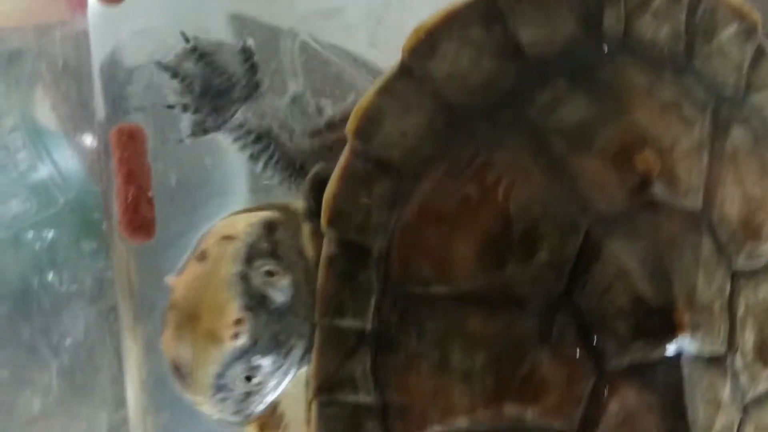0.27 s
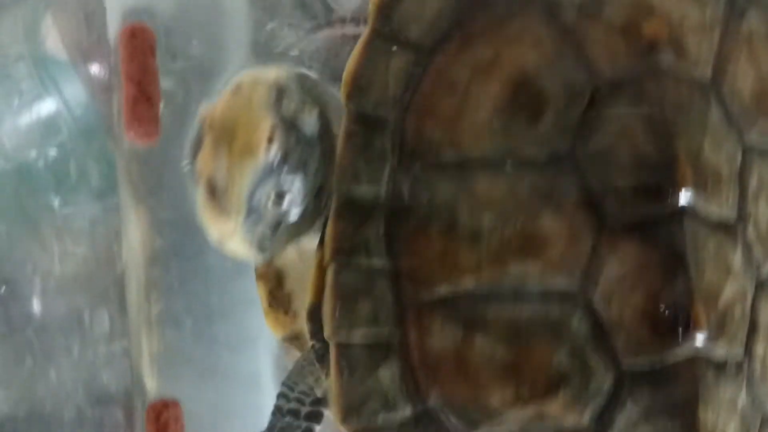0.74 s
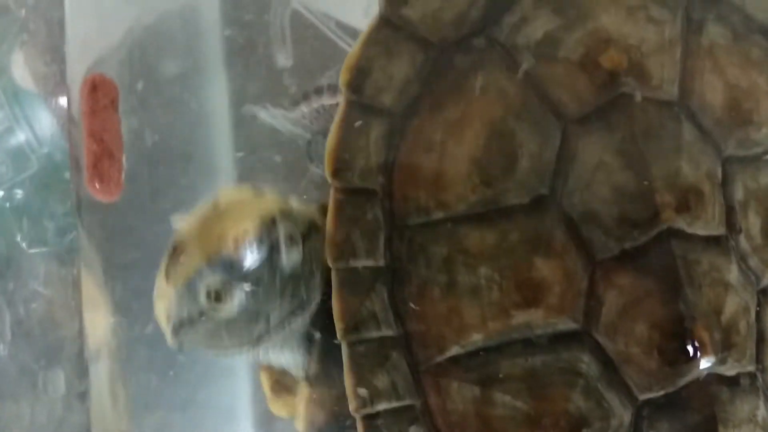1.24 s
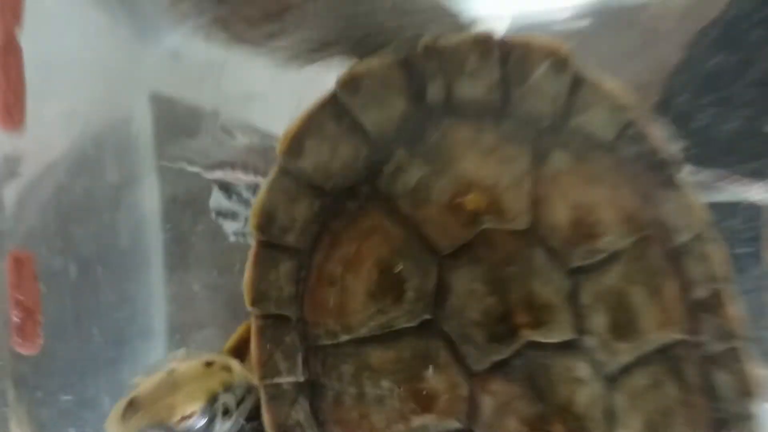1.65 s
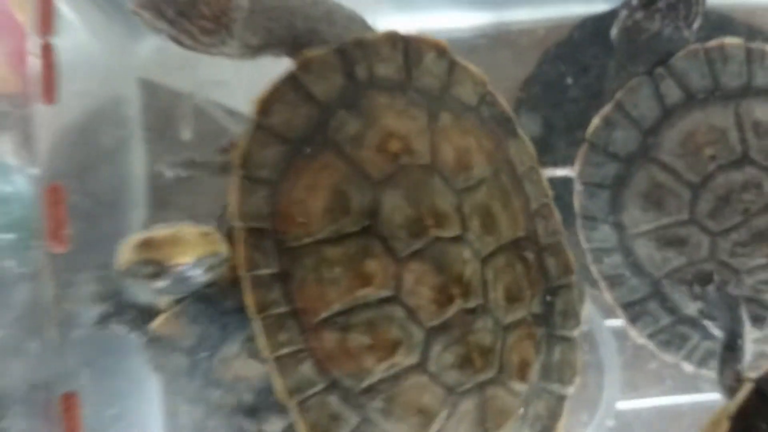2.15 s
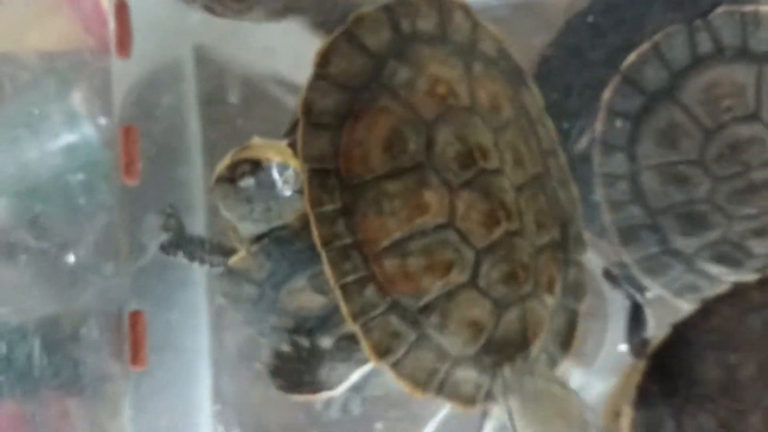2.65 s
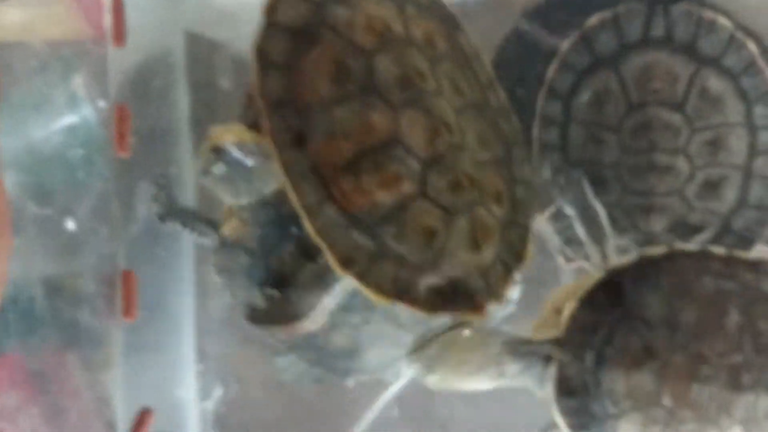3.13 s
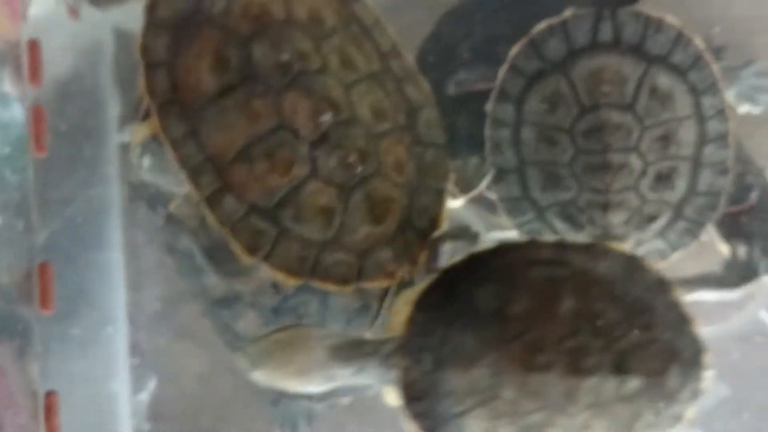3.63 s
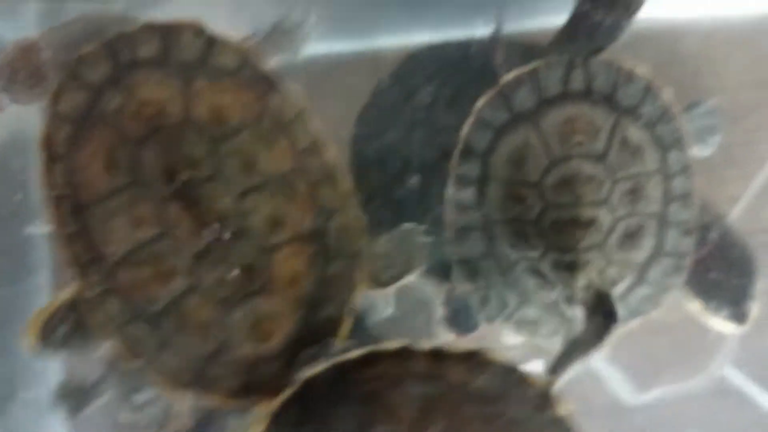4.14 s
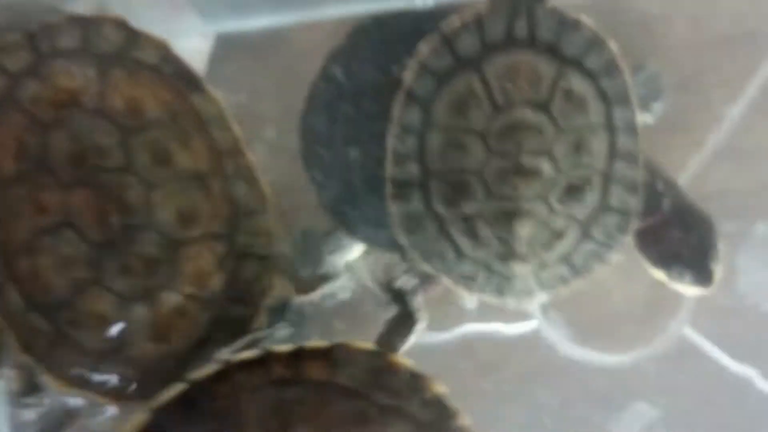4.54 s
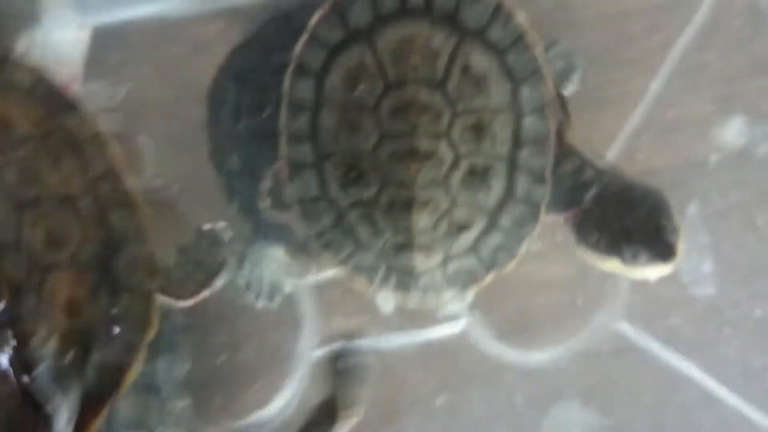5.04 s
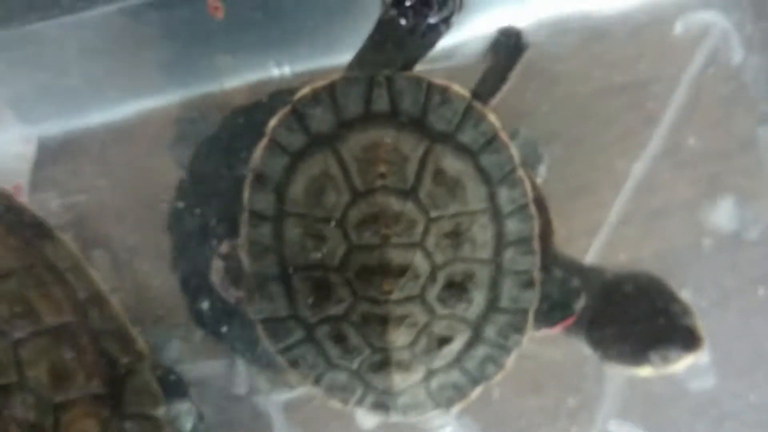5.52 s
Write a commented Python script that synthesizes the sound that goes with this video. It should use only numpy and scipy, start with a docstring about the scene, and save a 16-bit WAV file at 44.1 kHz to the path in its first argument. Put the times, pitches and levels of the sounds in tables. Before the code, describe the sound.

Small turtles scratch and knock hollowly against a plastic tank over soft hiss and a thin high equipment whine indoors.

```python
"""Indoors, equipment hums with a steady airy whine over even hiss while small turtles clamber in a plastic tank.
Hollow taps, decaying tones, come first among claw scratches, which are random tiny catches filtered by colour.
Dull bass bumps, swelling sine tones with muffled noise, and faint paddling follow.
Then shells knock hard on the walls: sums of decaying sines with coloured noise and sharp clicks.
Near the end a wet foot squeaks, a wavering tone whose pitch and level rise and fall."""
import sys
import numpy as np
from scipy import signal
from scipy.fft import rfft, irfft
from scipy.io import wavfile
from scipy.ndimage import uniform_filter1d

SR = 44100
rng = np.random.default_rng(int(sys.argv[2]) if len(sys.argv) > 2 else 0)


def materialize(psi):
    """Save the field psi as 16-bit PCM at rate SR to the path in sys.argv[1].

    A 1-D psi becomes a single channel; in a 2-D psi each row is a channel.
    """
    bounded = np.clip(np.atleast_2d(psi).T, -1, 1)
    quanta = np.round(bounded * 32767).astype(np.int16)
    wavfile.write(sys.argv[1], SR, quanta)


N = 254898
T = np.arange(SR // 2) / SR  # seconds since a contact

# colour of the highest, sharpest part of claw strokes and knocks: f/Hz, level/dB
TICK_COLOUR = [(3000, -46), (6000, -15), (7500, -9.5), (11000, 0), (13000, -7), (15500, 2.5)]


def undb(db):
    """Turn decibels into a gain."""
    return 10 ** (np.asarray(db) / 20)


def fade(t60):
    """Die away exponentially, falling by 60 dB in t60 seconds."""
    return np.exp(-np.log(1000) * T / t60)


def unit(x):
    """Scale a sound to an average (rms) level of 1."""
    return x / np.sqrt(np.mean(x ** 2))


def blow(x, db):
    """Give a short sound the energy of 30 ms of stereo sound at this level."""
    full_energy = 2 * 0.03 * SR
    return x * undb(db) / np.sqrt(np.sum(x ** 2) / full_energy)


def pan(db):
    """Left and right gains of constant power; db is left minus right."""
    return unit(undb(np.array([[db], [-db]]) / 2))


def colour(x, points):
    """Shape the spectrum through (Hz, dB) points, with no sound ahead of its cause."""
    n = x.shape[-1]
    hz, db = np.transpose(points)
    log_bins = np.log(np.fft.rfftfreq(n, 1 / SR) + 1)
    gain = undb(np.interp(log_bins, np.log(hz), db))
    # folding the cepstrum forward makes the filter causal
    cepstrum = irfft(np.log(gain), n)
    cepstrum[1:n // 2] *= 2
    cepstrum[n // 2 + 1:] = 0
    return irfft(rfft(x) * np.exp(rfft(cepstrum)), n)


def band(x, lo_hz, hi_hz, order=2):
    """Keep only the sound between two pitches."""
    return signal.sosfilt(signal.butter(order, [lo_hz, hi_hz], "band", fs=SR, output="sos"), x)


def add(out, s, x):
    """Mix a sound in at time s."""
    i = int(s * SR)
    out[:, i:i + x.shape[1]] += x[:, :N - i]


def steps(spell, gap_s, db, scatter_db=2):
    """Uneven footfalls through a spell, about gap_s apart: rows of (s, dB)."""
    late, strong = rng.random((32, 2)).T
    times = spell[0] + gap_s * (np.arange(len(late)) + late)
    end = min(spell[1], N / SR)
    return [(s, db + scatter_db * (2 * u - 1)) for s, u in zip(times, strong) if s < end]


def tank(x, direct_db=-7, near_t60=0.03, room_t60=0.1, room_db=-20):
    """Add the straight path, a quick flurry between the tank's walls, and the room's echo."""
    flurry = fade(near_t60) * (1 - fade(0.0015))
    room = undb(room_db) * fade(room_t60)
    paths = blow(rng.standard_normal((2, len(T))) * (flurry + room), 0)
    straight = np.zeros_like(paths)
    straight[0, 10] = straight[1, 0] = 1  # the left hears it 10 samples later
    return signal.fftconvolve(paths + blow(straight, direct_db), x, axes=1)[:, :len(T)]


def ring(modes, spread):
    """Ring a set of modes, weighted anew each time, left and right out of step by about spread radians."""
    out = 0
    for k, (hz, db, t60) in enumerate(modes):
        weight, detune, shift = rng.standard_normal(3)
        stereo_shift = spread * shift * np.array([[0.5], [-0.5]])
        phase = 2 * np.pi * hz * (1 + 0.0017 * detune) * T + stereo_shift
        sign = (-1) ** k
        out = out - sign * undb(db + 2 * weight) * fade(t60) * np.sin(phase)
    return out * (1 - fade(0.0067))


def murk(points, t60, apart_hz=900):
    """Countless crowded modes die away together as noise; left and right agree only in the bass."""
    mid, side = rng.standard_normal((2, len(T))) * fade(t60)
    side = signal.sosfilt(signal.butter(1, apart_hz, "high", fs=SR, output="sos"), side)
    return colour(np.array([mid + side, mid - side]), points)


def background(hiss_db=-61, whine_db=-60, whine_hz=5430, width_hz=370, rumble_db=-60, hum_db=-73):
    """Filtered noise gives hiss, a narrow whine and faint drone from equipment, and a fitful low rumble."""
    # colour of the hiss: f/Hz, level/dB
    hiss_colour = [(25, -22), (60, -13), (120, -11), (200, 3), (300, -3), (500, -0.5), (1000, 0),
                   (2000, -3.5), (3500, -4), (4700, -2), (6000, -6.5), (7500, -7.5), (12000, -7.5),
                   (15500, -15)]
    hiss = unit(colour(rng.standard_normal((2, N)), hiss_colour)) * pan(-2.1)

    whine = band(rng.standard_normal((2, N)), whine_hz - width_hz / 2, whine_hz + width_hz / 2)
    whine = unit(whine) * pan(-10)

    swell = undb(4.55 * unit(band(rng.standard_normal(N), 1.0, 11.6, order=1)))
    stirring = np.interp(np.arange(N) / SR, [1.1, 1.5, 5.5, 5.78], undb([-6, 1, 1.5, -3.5]))
    rumble = unit(band(rng.standard_normal(N), 48.0, 83.4) * swell) * stirring * pan(-17.5)

    low_hum = band(rng.standard_normal(N), 113.0, 130.2)
    high_hum = undb(-8) * band(rng.standard_normal(N), 285, 331)
    hum = unit(low_hum + high_hum) * pan(-0.5)
    return undb(hiss_db) * hiss + undb(whine_db) * whine + undb(rumble_db) * rumble + undb(hum_db) * hum


def jostling(paddle_gap_s=0.086, paddle_db=-57.5, length_s=0.014, sharp_db=-3, nudge_gap_s=0.22, nudge_db=-51):
    """Between the clear contacts the turtles paddle faintly at the plastic and nudge the tank."""
    # spells of paddling: start t/s, end t/s
    paddling_spells = [(1.52, 1.9), (2.69, 2.89)]
    # spells of faint bumps: start t/s, end t/s
    nudging_spells = [(2.42, 3.2), (5.15, 5.45)]
    strokes = []
    for spell in paddling_spells:
        strokes += [(s, db, length_s, sharp_db) for s, db in steps(spell, paddle_gap_s, paddle_db)]
    nudges = []
    for spell in nudging_spells:
        nudges += steps(spell, nudge_gap_s, nudge_db)
    return claws(strokes) + bumps(nudges)


def bumps(pushes, bump_db=0, hz=64, t60=0.16, rub_db=-10):
    """Soft, dull bumps swell and die in the bass, mostly on the right, each with a brief muffled rub."""
    # colour of the rub: f/Hz, level/dB
    rub_colour = [(25, -3), (50, -7), (130, 5.5), (200, -7.5), (330, -7), (450, -11), (700, -33)]
    out = np.zeros((2, N))
    swell = 1 - fade(0.05)
    for s, db in pushes:
        bump_hz = hz * (1 + 0.068 * rng.standard_normal())
        boom = np.sin(2 * np.pi * bump_hz * T) * fade(t60) * swell
        rub = murk(rub_colour, t60=0.16) * swell
        both = blow(boom, -2.5) * pan(-29.0) + blow(rub, rub_db) * pan(-8.5)
        add(out, s, undb(db + bump_db) * both)
    return out


def claws(strokes, rasp_db=0, tick_db=0, catches_per_s=1500, scatter_db=4, pitch_db=-1, width_hz=900):
    """A claw skids over the plastic in a short run of tiny catches; a slower stroke rasps lower."""
    # colour of the rasp: f/Hz, level/dB
    rasp_colour = [(150, -19), (600, -7.5), (1500, -0.5), (3000, -0.5), (4500, -2), (6000, 5), (7200, -8),
                   (10000, -35)]
    usual_hz, usual_length_s, pitch_fall = 4670, 0.011, 0.16  # a stroke of the usual length has the usual pitch
    out = np.zeros((2, N))
    for s, db, length, sharp in strokes:
        hz = usual_hz * (usual_length_s / length) ** pitch_fall
        caught = rng.random(len(T)) < catches_per_s / SR
        slips = caught * undb(scatter_db * rng.standard_normal(len(T)))
        slips[0] = 1  # the first touch always sounds
        effort = (2.5 + T / length) * np.exp(-(T / length) ** 3)
        push = (slips * rng.choice([-1, 1], len(T)) * effort)[None]

        scratch = tank(push, near_t60=0.014, room_t60=0.17, room_db=-10)
        pitched = band(scratch, hz - width_hz / 2, hz + width_hz / 2, order=1)
        rasping = blow(colour(scratch, rasp_colour), 0) + blow(colour(pitched, rasp_colour), pitch_db)
        ticking = colour(tank(push, near_t60=0.014, room_t60=0.13, room_db=-10.5), TICK_COLOUR)
        stroke = blow(rasping, db + rasp_db) + blow(ticking, db + sharp + tick_db)
        add(out, s, stroke * pan(-2))
    return out


def squeak(start_s=5.516, length_s=0.076, low_hz=710, top_hz=1083, level_db=-53.5, swell_db=11,
           third_db=-9, flutter_db=4.5):
    """A wet foot sticks and slips on the wall unsteadily, faster and louder at the height of its push."""
    progress = (np.arange(N) / SR - start_s) / length_s
    push = np.sin(np.pi * np.clip(progress, 0, 1))
    hz = low_hz + (top_hz - low_hz) * push
    loud = undb(level_db + swell_db * (push - 1)) * (progress > 0) * (progress < 1)
    wobble = 0.06 * unit(uniform_filter1d(rng.standard_normal(N), size=50))
    grip = undb(flutter_db * unit(band(rng.standard_normal(N), 47, 220)))
    phase = 2 * np.pi * np.cumsum(hz * (1 + wobble)) / SR
    tone = np.sin(phase) + undb(third_db) * np.sin(3 * phase)
    return unit(grip * tone) * loud * pan(-4)


def taps(echo_db=-13, slap_db=-14, body_db=-11, soft_hz=3200, swell_s=0.0034):
    """A stiff spot of the plastic rings briefly and stirs the whole tank."""
    # hollow taps: t/s, f/Hz, level/dB of the bare tone, time to fall 60 dB/s, left minus right/dB
    tap_list = [(0.162, 474, -56, 0.05, 3), (0.1721, 1283, -41, 0.015, -3.5),
                (0.2361, 2268, -29, 0.037, -2), (0.2754, 1226, -41.5, 0.062, -2.5),
                (2.99, 1100, -52, .1, -4), (4.7354, 2960, -38, 0.019, 0)]
    # colour of the tank's answer: f/Hz, level/dB
    body_colour = [(120, -26), (190, 7.5), (320, -6), (520, 3.5), (750, -6), (1250, -5), (1700, -9),
                   (2500, -1), (3500, -24)]
    out = np.zeros((2, N))
    impulse = signal.unit_impulse(len(T))[None]
    for s, hz, db, t60, side in tap_list:
        stereo_phase = np.array([[0], [1.8]])  # radians
        tone = np.sin(2 * np.pi * hz * T + stereo_phase) * fade(t60) * (1 - fade(swell_s))
        tone = band(tone, 190, soft_hz * np.sqrt(hz / 2000), order=4)  # a soft contact has no sharp edge
        echo = tank(tone, direct_db=-20, near_t60=0.11, room_t60=0.15, room_db=3)
        slap = band(tank(impulse, near_t60=0.012), hz * 0.37, hz * 1.03, order=4)
        stirred = band(murk(body_colour, t60=0.25), 190, hz * 1.3, order=3)  # little above the tap's own pitch
        tap = blow(tone, db) + blow(echo, db + echo_db)
        tap = tap + blow(slap, db + slap_db) + blow(stirred, db + body_db)
        add(out, s, tap * pan(side))
    return out


def knocks(boom_db=-1, wall_db=-3.0, hollow_db=-2, clack_db=-1, click_db=-3, tick_db=-3, thud_db=-6,
           murk_db=0, modes_db=-4, flex_s=0.0015, build_s=0.089):
    """A hard shell cracks against the wall, which rings and booms like a drum skin."""
    # knocks: t/s of contact, strength/dB, weight behind it/dB, glance (0 square to 1 grazing),
    # sharpness of the edge/dB, left minus right/dB
    knock_list = [(2.609, -55, -4.5, 0.088, -9, -5.5), (2.676, -58, -10, 0.17, -10, -8),
                  (2.9749, -43, -30, 0.25, -7, -8), (3.2858, -35.5, -8, 0.0067, -10.5, -5),
                  (4.206, -58, -8, 0, -5, -4), (4.267, -60, -21, 0, -5, -1.5),
                  (4.7344, -35.5, 10.5, 0.07, -7.5, -6), (4.824, -42, 0, 1, -21, -8),
                  (4.8323, -35.5, 3.5, 1, -6.5, -2), (4.8526, -33.5, -5, 0.43, -20, -4),
                  (4.8782, -41, 8.5, 0.38, -9, -5), (4.9172, -40.5, -33, 1, -7, -2),
                  (5.0329, -42, -9.5, 0.29, -1.5, -5)]
    # ways the wall rings, roughly from low to high, each: f/Hz, level/dB, time to fall 60 dB/s
    boom_modes = [(114.7, 7.5, 0.26), (167, 5, 0.12), (193.3, -8, 0.386), (241, 2, 0.038)]
    wall_modes = [(292, -4, 0.35), (323, 15.5, 0.051), (400.8, 2.5, 0.21), (471.6, -1.5, 0.22)]
    hollow_modes = [(524, -4.5, 0.25), (592, -10, 0.35), (722, -4, 0.33), (791, 7, 0.18), (880, 1.5, 0.24),
                    (950, -3, 0.24)]
    clack_modes = [(1136, -9, 0.18), (1163, 3.5, 0.11), (1290, 5.5, 0.21), (1380, -1, .14),
                   (1374, -9.5, 0.26), (1990, 3, 0.14), (2210, -32, 0.07), (2350, 3, 0.1),
                   (2800, -3, 0.025)]
    # colours of the dull thud, the hollow knock and the bright click, each: f/Hz, level/dB
    thud_colour = [(120, 0), (190, 8.5), (300, -3), (420, 1), (500, -20), (620, -37), (1000, -34.5)]
    hollow_colour = [(330, -21.5), (520, 1.5), (650, -3.5), (850, -2), (1050, -4.5), (1400, -12),
                     (2200, -31.5)]
    click_colour = [(1500, -12), (3000, 12), (4400, 13.5), (5800, 15.5), (7000, 1), (10000, -21)]
    weight_share = 0.27  # weight feeds the boom in full and the wall's ring by this share
    hollow_glance_db, clack_glance_db = -28, -15.5  # change for a fully grazing blow
    out = np.zeros((2, N))
    impulse = signal.unit_impulse(len(T))[None]
    for s, db, weight, glance, sharp, side in knock_list:
        boom, wall = db + weight, db + weight_share * weight
        hollow, clack = db + hollow_glance_db * glance, db + clack_glance_db * glance

        booming = blow(ring(boom_modes, 0.27), boom + boom_db)
        ringing = blow(ring(wall_modes, 0.63), 0) + blow(murk(thud_colour, t60=0.32), thud_db)
        build_up = 1 - fade(build_s * undb(weight / 2))  # a heavy push builds up slowly
        ringing = blow(ringing * build_up, wall + wall_db)

        woody = blow(ring(hollow_modes, 3.47), 0) + blow(murk(hollow_colour, t60=0.28), murk_db)
        woody = blow(woody, hollow + hollow_db)

        slap = band(tank(impulse, near_t60=0.18, room_t60=0.13, room_db=12), 1190, 3030, order=4)
        clacking = blow(ring(clack_modes, 3.16), modes_db) + blow(slap, 0)
        clacking = blow(clacking, clack + clack_db)

        crack = tank(impulse, near_t60=0.032, room_t60=0.21, room_db=-10.5)
        snap = tank(impulse, direct_db=-8, near_t60=0.036, room_t60=0.22, room_db=-16)
        click = blow(colour(crack, click_colour), db + click_db)
        tick = blow(colour(snap, TICK_COLOUR), db + sharp + tick_db)

        low = booming * pan(-6.5) + ringing * pan(-0.62)
        high = (woody + clacking + click + tick) * pan(side)
        add(out, s + flex_s, low + high)  # sounds just after the contact, once the wall flexes
    return out


def scene():
    """Mix everything in and around the tank."""
    # clear claw strokes: t/s, level/dB of the rasp, length/s, sharpness of the claw/dB
    claw_list = [(0.2355, -42, 0.0015, -17), (.259, -42.5, 0.012, -0.5), (0.311, -50, 0.0054, 8),
                 (0.444, -56, .003, -11), (0.5537, -48.5, 0.013, 0.5), (0.597, -56.5, 0.015, -6),
                 (0.762, -49, 0.0059, -2.5), (1.321, -58.5, 0.011, 2), (1.794, -48, .019, -8.5),
                 (1.848, -55.5, 0.024, -6), (3.065, -55, 0.011, -15), (3.209, -57, 0.023, -18),
                 (3.704, -59, 0.037, 1), (3.9194, -54.5, 0.0044, 2), (4.061, -50.5, 0.012, -3),
                 (5.347, -55, 0.019, -7), (5.526, -47, 0.082, -8.5), (5.592, -52, 0.0091, -5)]
    # clear soft bumps: t/s, level/dB before the shares of boom and rub
    bump_list = [(1.189, -50.5), (1.248, -58), (1.362, -45.5), (1.663, -45.5), (1.73, -51), (1.987, -54),
                 (2.086, -45), (3.656, -49), (4.307, -41), (4.972, -40.5)]
    return background() + knocks() + taps() + claws(claw_list) + bumps(bump_list) + squeak() + jostling()


def record(dry):
    """The phone's steep low-pass filter removes the sound above 15900 Hz."""
    return signal.sosfilt(signal.ellip(10, 0.2, 70, 15900, fs=SR, output="sos"), dry)


dry = scene()
out = record(dry)
materialize(out)
```